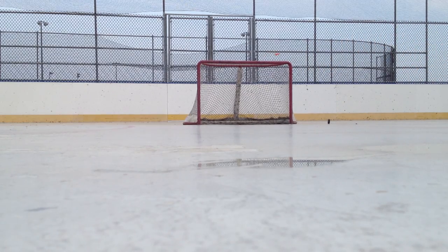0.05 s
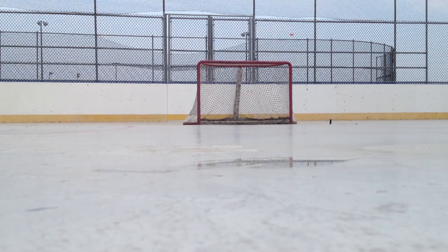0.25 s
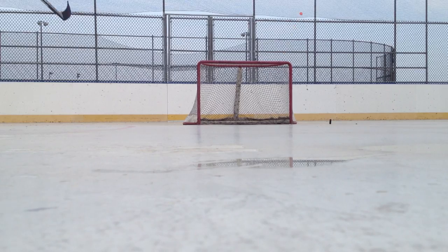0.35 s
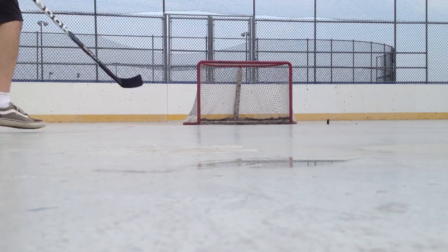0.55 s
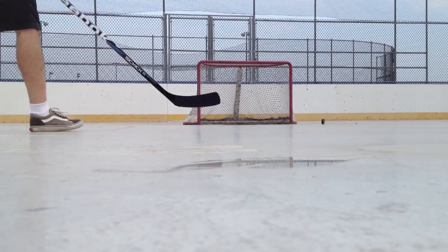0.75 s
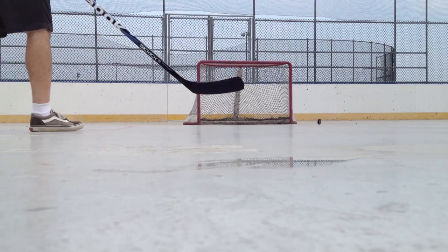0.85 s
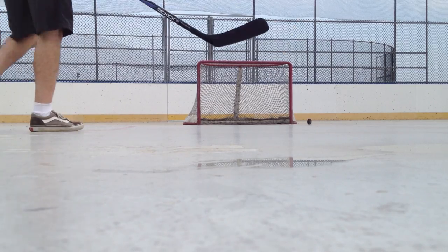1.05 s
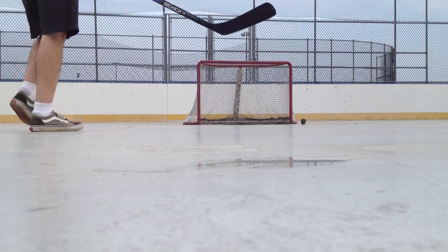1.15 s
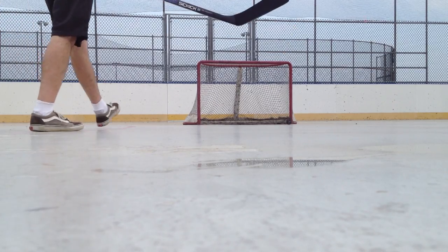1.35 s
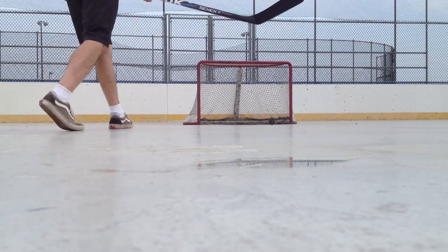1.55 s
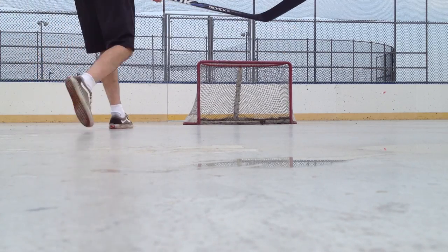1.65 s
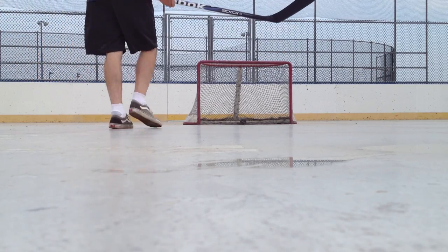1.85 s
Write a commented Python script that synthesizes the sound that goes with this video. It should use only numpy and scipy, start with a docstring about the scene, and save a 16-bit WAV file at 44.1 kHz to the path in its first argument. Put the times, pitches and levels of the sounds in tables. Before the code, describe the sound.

A sharp, ringing clank of a puck hitting a metal goal, then a faint shoe scuff.

```python
"""A hockey puck hits the steel post of a goal on an outdoor rink. Distant town noise lies underneath.
A far bird chirps faintly; then the puck gives a first touch and the full blow, and the pipe rings in
beating modes over the clank of the frame. The near boards answer at once, the far end a moment later.
Something ticks faintly as the ring dies. Last, a shoe close by scuffs grit on the concrete."""
import sys
import numpy as np
from scipy import signal
from scipy.fft import rfft, irfft, next_fast_len
from scipy.io import wavfile
from scipy.ndimage import uniform_filter1d

SR = 44100
rng = np.random.default_rng(int(sys.argv[2]) if len(sys.argv) > 2 else 0)


def dump_mix(stems):
    """Bounce the given channels to the path in sys.argv[1] as a 16-bit WAV at rate SR."""
    frames = np.atleast_2d(stems).T  # one column per channel
    limited = np.clip(frames, -1, 1)  # hard clip at full scale
    pcm = np.round(limited * 32767).astype(np.int16)
    wavfile.write(sys.argv[1], SR, pcm)


N = 83790

# Spectrum of the frame's clank. Each row: frequency in Hz, relative density in dB.
CLANK_SPECTRUM = [(60, -53), (150, -49), (500, -18), (1000, -8), (1900, -9), (2600, 2), (3300, -8),
                  (4700, -5.5), (5200, -15.5), (6400, -2.5), (7000, -11.5), (8300, -15.5), (9000, -36.5),
                  (10300, -42), (12500, -23.5), (15500, -36.5)]


def amp(db):
    """Decibels to gain."""
    return 10 ** (np.asarray(db) / 20)


def unit(x):
    """Scale to rms 1."""
    return x / np.sqrt(np.mean(x ** 2) + 1e-20)


def along(points, hz):
    """Interpolate (Hz, value) points on a log frequency axis."""
    point_hz, values = np.transpose(points)
    return np.interp(np.log(hz + 1), np.log(point_hz + 1), values)


def filtered(x, response):
    """Apply a gain given as a function of Hz."""
    size = next_fast_len(N + SR // 2)
    return irfft(rfft(x, size) * response(np.fft.rfftfreq(size, 1 / SR)), size)[:N]


def noise(spectrum):
    """Noise of rms 1, coloured by (Hz, dB) points."""
    return unit(filtered(rng.standard_normal(N), lambda hz: amp(along(spectrum, hz))))


def fade(t60_s, attack_s=1e-4):
    """A rise and an exponential decay."""
    t = np.arange(N) / SR
    return np.exp(-np.log(1000) * t / t60_s) * (1 - np.exp(-t / attack_s))


def at(start_s, x):
    """Delay x to start_s."""
    return np.pad(x, (max(round(start_s * SR), 0), 0))[:N]


def mode(hz, t60_s, attack_s=1e-4):
    """One damped vibration."""
    return fade(t60_s, attack_s) * np.sin(2 * np.pi * hz * np.arange(N) / SR)


def scatter(t60_s, attack_s=1e-4):
    """Response of a rough wall: dying noise of energy 1."""
    tail = rng.standard_normal(N) * fade(t60_s, attack_s)
    return tail / np.linalg.norm(tail)


def town(rms_db=-53, patchy_db=0.5):
    """Distant rumble with faint hiss, slightly patchy in time and frequency."""
    # Each row: frequency in Hz, relative density in dB.
    spectrum = [(15, -76), (25, -56.5), (48, -40.5), (89, -13), (178, 0.5), (389, -7), (445, -11.5),
                (509, -10), (582, -11.5), (684, -10), (762, -9.5), (1020, -8.5), (2360, -26), (4750, -31),
                (6210, -38.5), (7910, -25), (9550, -46.5), (14300, -36), (15500, -46)]
    bins = signal.stft(noise(spectrum), nperseg=512)[2]
    patches = uniform_filter1d(rng.standard_normal(bins.shape), size=5, axis=0)
    patches = unit(uniform_filter1d(patches, size=16, axis=1))
    return amp(rms_db) * unit(signal.istft(bins * amp(patchy_db * patches))[1][:N])


def bird(top_hz=4720, rise_hz=1500, rise_s=.028):
    """A far bird: each chirp swells, climbs to its top note and breaks off just past it."""
    # Each row: time of the top note in seconds, level in dB.
    chirps = [(.05, -72), (.09, -71), (.13, -70), (.163, -69)]
    progress = np.minimum(np.arange(N) / SR / rise_s, 1.3)  # 1 at the top note
    pitch_hz = top_hz - rise_hz * (1 - np.sin(np.pi * progress / 2))
    swell = np.sqrt(progress) * np.sqrt(np.abs(np.sin(np.pi * progress / progress[-1])))
    chirp = swell * np.sin(2 * np.pi * np.cumsum(pitch_hz) / SR)
    return sum(amp(db) * at(top_s - rise_s, chirp) for top_s, db in chirps)


def post(hit_s=0.2153, touch_lead_s=.0033):
    """The puck touches, then strikes: the contact cracks, the pipe rings in close, beating modes."""
    # Each row: frequency in Hz, relative level in dB, t60 in seconds.
    pipe_modes = [(961, -34, .26), (993, -30, .3), (2181, -28, .55), (2204, -28, .55), (2229, -25, .65),
                  (2253, -15.5, .68), (2288, -24.5, .66), (2457, -28, .28), (2543, -19, .37),
                  (2698, -17.5, .41), (3844, -27, .2), (5884, -28, .18), (6244, -22, .25), (6343, -15, .14),
                  (6407, -21, .15)]
    ring = sum(amp(db + rng.normal(0, .5)) * mode(hz, t60_s, attack_s=.0038)
               for hz, db, t60_s in pipe_modes)
    bite = mode(hz=2271, t60_s=.05, attack_s=.0029)  # the pipe wall's first hard swing
    clank = frame_clank()
    push = mode(hz=2650, t60_s=.0043)
    spray = rng.standard_normal(N) * fade(t60_s=.0042)
    crack = amp(-9.5) * push + amp(-23) * spray
    blow = amp(-4.5) * ring + amp(-5.5) * bite + amp(-19.5) * clank + crack
    touch = amp(-17.5) * noise(CLANK_SPECTRUM) * fade(t60_s=.06)
    return at(hit_s, blow) + at(hit_s - touch_lead_s, touch)


def frame_clank(spacing_hz=22, rattle_db=-5.5, attack_s=.0013):
    """A crowd of unevenly spaced frame modes with a little rattle; the treble dies first."""
    # Each row: frequency in Hz, t60 in seconds.
    decay_times = [(400, .38), (1000, .4), (2600, .34), (4500, .25), (6300, .24), (8500, .16), (14000, .18)]
    slots = np.arange(1, 15500 / spacing_hz)
    offset, phase = rng.random((1000, 2))[:len(slots)].T
    mode_hz = (slots + offset) * spacing_hz
    gains = amp(along(CLANK_SPECTRUM, mode_hz))
    lines = np.zeros(N // 2 + 1, complex)
    lines[np.round(mode_hz * N / SR).astype(int)] = gains * np.exp(2j * np.pi * phase)
    steady = unit(unit(irfft(lines, N)) + amp(rattle_db) * noise(CLANK_SPECTRUM))
    bin_hz, age_s, bins = signal.stft(steady, SR, nperseg=256)
    decay = np.exp(-np.log(1000) * age_s / along(decay_times, bin_hz)[:, None])
    rise = 1 - np.exp(-np.arange(N) / SR / attack_s)
    return signal.istft(bins * decay, SR)[1][:N] * rise


def near_echoes():
    """Response of the near boards and fence, plus single coloured slaps off flat walls."""
    # Each row: delay in seconds, level in dB.
    boards = [(.0225, -7), (.052, -15.5)]
    # Each row: delay in seconds, level at band centre in dB, centre in Hz, width in octaves, t60 in seconds.
    slaps = [(0.111, -9, 1060, 0.24, 0.047), (.235, -26, 6180, 0.065, 0.061),
             (0.324, -28.5, 6100, 0.11, 0.041)]
    echoes = sum(amp(db) * at(delay_s, scatter(t60_s=.039)) for delay_s, db in boards)
    for delay_s, db, centre_hz, width_oct, t60_s in slaps:
        band = lambda hz: np.exp(-(np.log2((hz + 1) / centre_hz) / width_oct) ** 2)
        echoes += amp(db) * filtered(at(delay_s, scatter(t60_s)), band)
    return echoes


def far_echoes(wash_db=-28.5):
    """Response of the rink's far end, duller and smeared, over a faint long wash."""
    # Each row: delay in seconds, level before colouring in dB, rise in seconds, t60 in seconds.
    far_end = [(.24, -27.5, 0.0068, .2), (.275, -24, 0.046, 0.36), (.35, -27, 0.034, 0.65)]
    # Each row of both: frequency in Hz, gain in dB.
    far_colour = [(300, 7), (1000, 6), (1750, 7.5), (2250, 1.5), (2700, 0), (4500, -6.5), (6200, -9.5),
                  (7200, -25), (10000, -20)]
    wash_colour = [(300, 2), (2250, -1), (2700, -4), (4500, -4), (6300, -11.5), (10000, -20)]
    echoes = sum(amp(db) * at(delay_s, scatter(t60_s, rise_s)) for delay_s, db, rise_s, t60_s in far_end)
    echoes = filtered(echoes, lambda hz: amp(along(far_colour, hz)))
    wash = scatter(t60_s=1.5, attack_s=.05)
    return echoes + filtered(wash, lambda hz: amp(wash_db + along(wash_colour, hz)))


def ticks():
    """Tiny bright ticks close by."""
    # Each row: start in seconds, level in dB.
    events = [(0.326, -52.5), (.655, -57), (.682, -63), (.686, -59), (.7065, -61), (.752, -53.5)]
    # Each row: frequency in Hz, relative density in dB.
    spectrum = [(2000, -20), (6000, -6), (8000, 1), (11000, -4.5), (15000, -8.5)]
    return sum(amp(db) * at(start_s, noise(spectrum) * fade(t60_s=.007)) for start_s, db in events)


def shoe():
    """The sole crushes grains of grit: each a short pitched snap, then a crunch of crumbs."""
    # Each row: start in seconds, level in dB, pitch in Hz, t60 in seconds.
    grains = [(1.8105, -26.5, 1580, 0.0049), (1.816, -28, 2590, 0.0075), (1.8233, -26, 4200, 0.0045),
              (1.8452, -33, 2180, 0.0056), (1.850, -31.5, 4460, 0.0049), (1.86, -35.5, 1470, 0.0035),
              (1.8655, -30.5, 4170, 0.0034)]
    # Each row: frequency in Hz, relative density in dB.
    crunch_spectrum = [(200, -14), (800, 6.5), (4500, 2.5), (6000, -7), (10000, -11), (15000, -19.5)]
    crunch = lambda: amp(-14) * noise(crunch_spectrum) * fade(t60_s=.039)
    return sum(amp(db) * at(start_s, mode(hz, t60_s) + crunch()) for start_s, db, hz, t60_s in grains)


def scene():
    """The struck goal in its rink, with the small sounds around it."""
    low_cut = signal.butter(2, 130, "high", fs=SR, output="sos")  # the struck goal sounds with no deep bass
    goal = signal.sosfilt(low_cut, post())
    echoes = signal.fftconvolve(goal, near_echoes() + far_echoes())[:N]
    return (goal + echoes + shoe() + ticks() + bird() + town())[None]


def record(dry):
    """Brick-wall low-pass."""
    return filtered(dry[0], lambda hz: hz < 15650)[None]


dry = scene()
out = record(dry)
dump_mix(out)
```